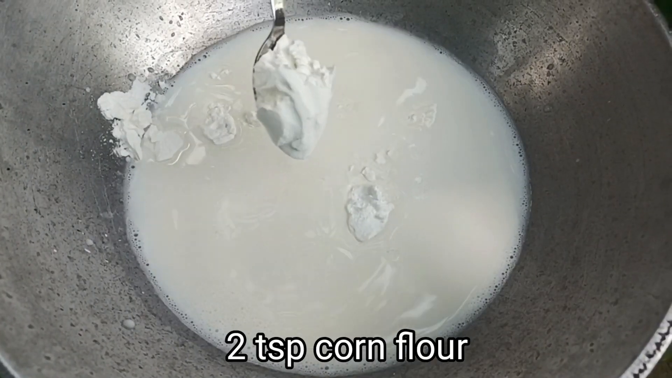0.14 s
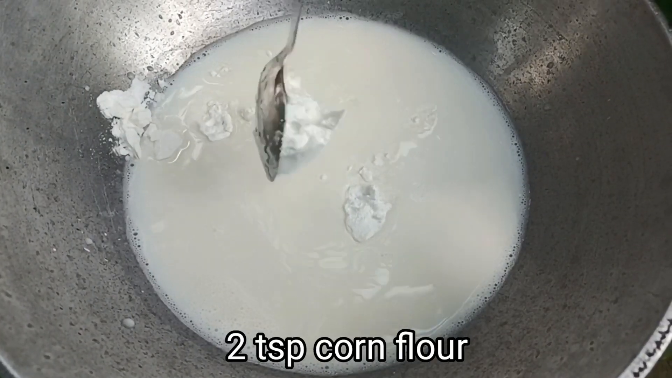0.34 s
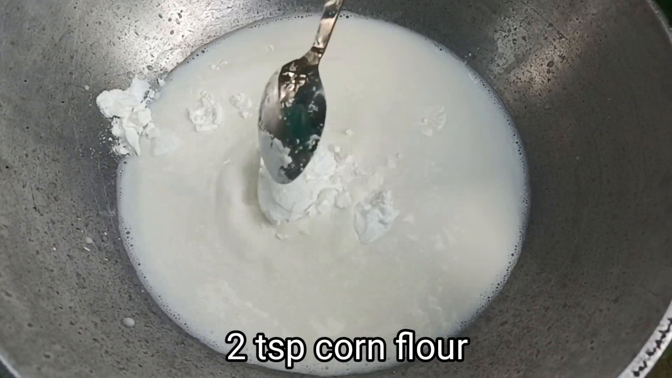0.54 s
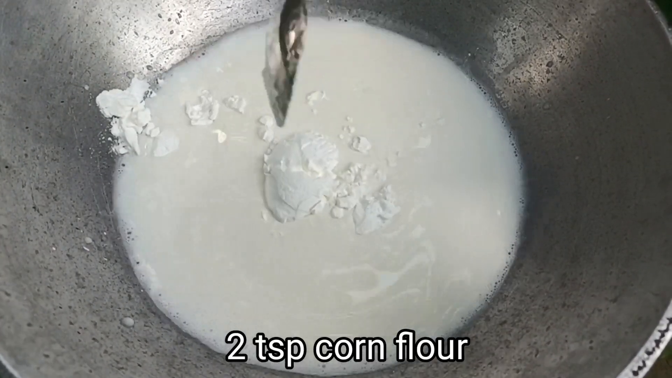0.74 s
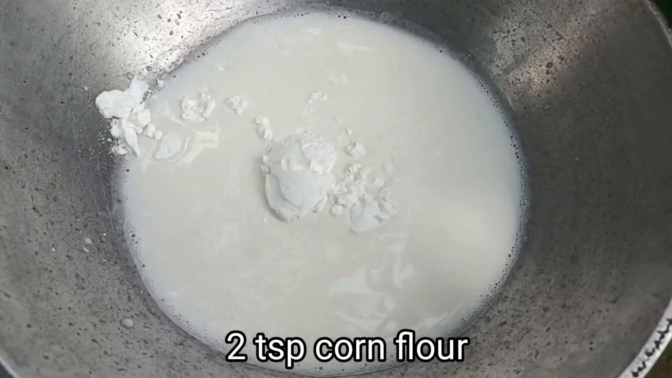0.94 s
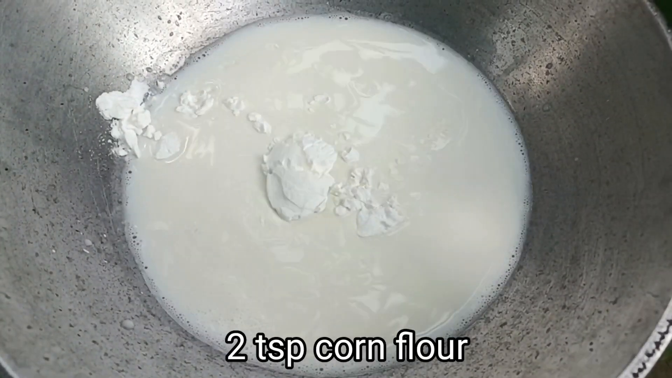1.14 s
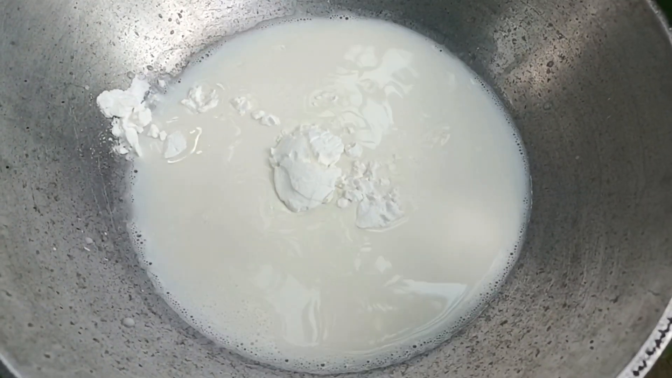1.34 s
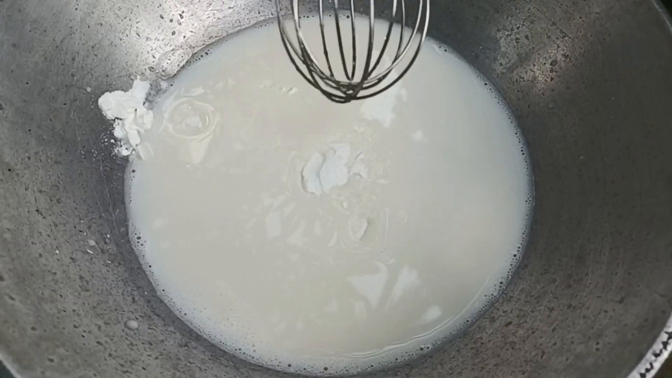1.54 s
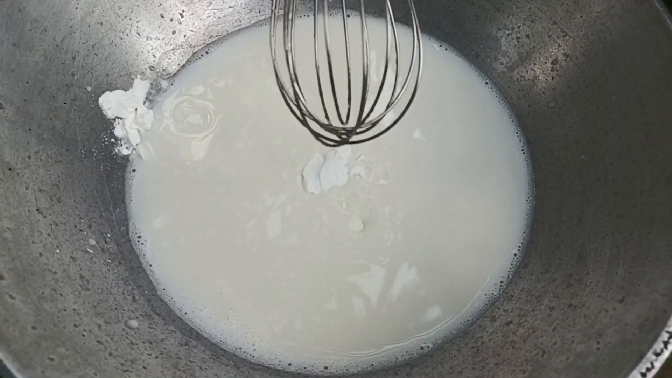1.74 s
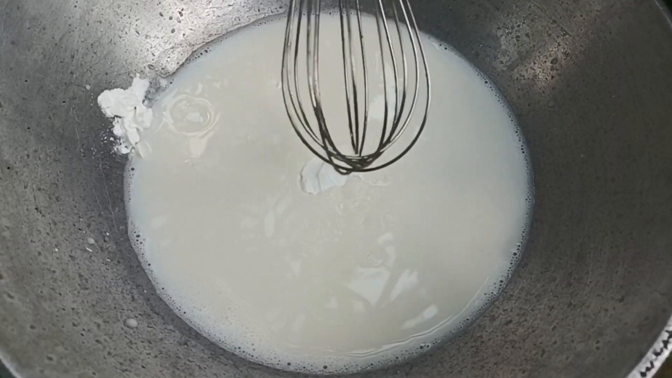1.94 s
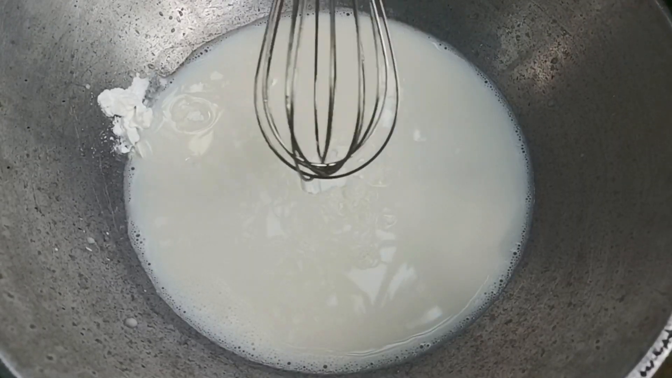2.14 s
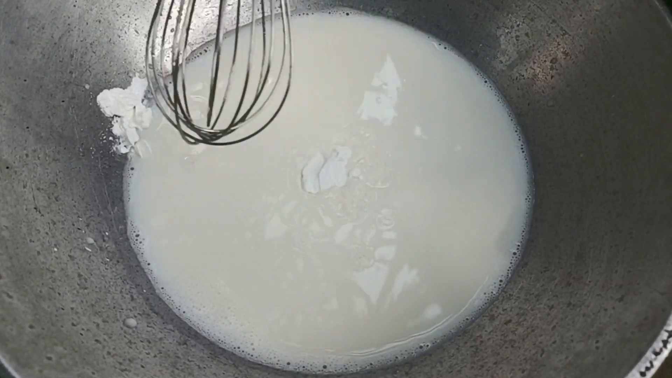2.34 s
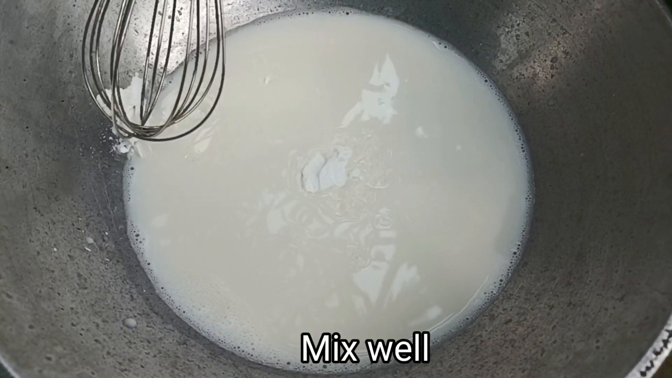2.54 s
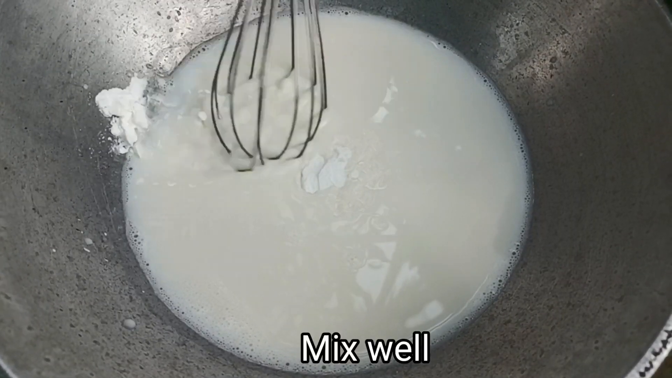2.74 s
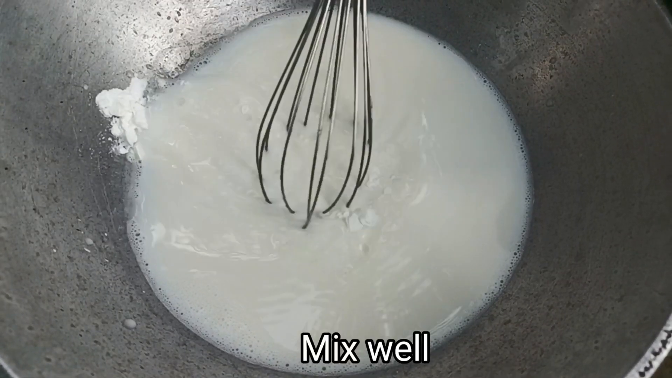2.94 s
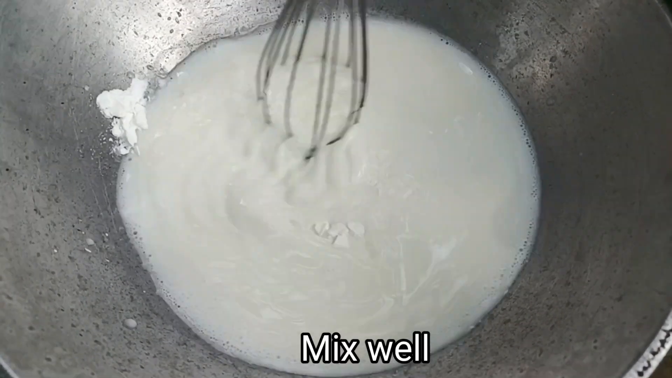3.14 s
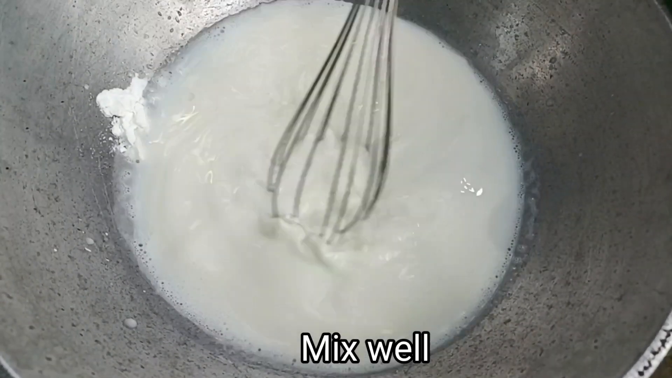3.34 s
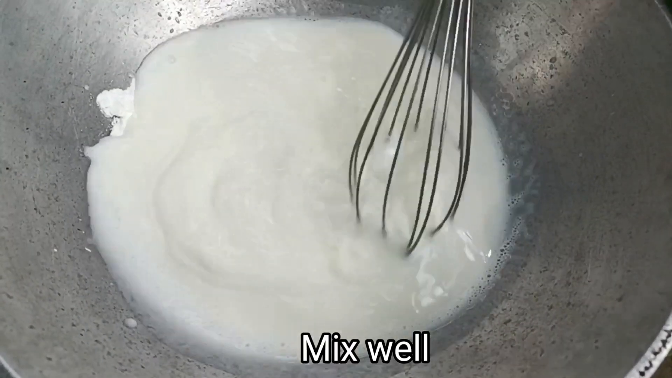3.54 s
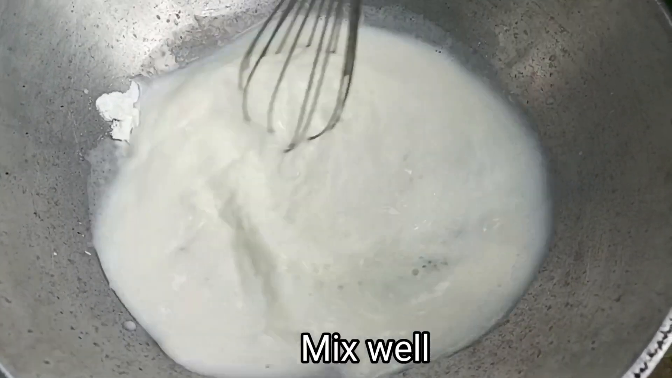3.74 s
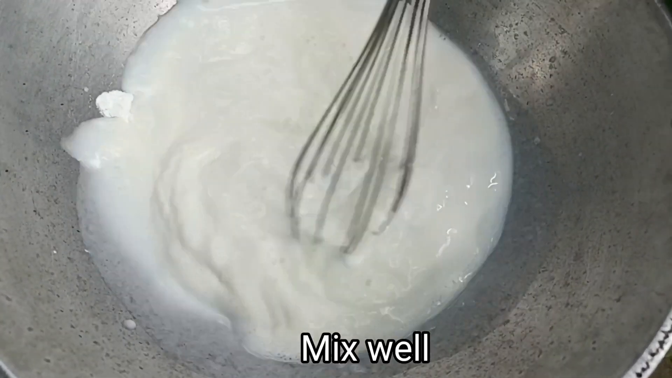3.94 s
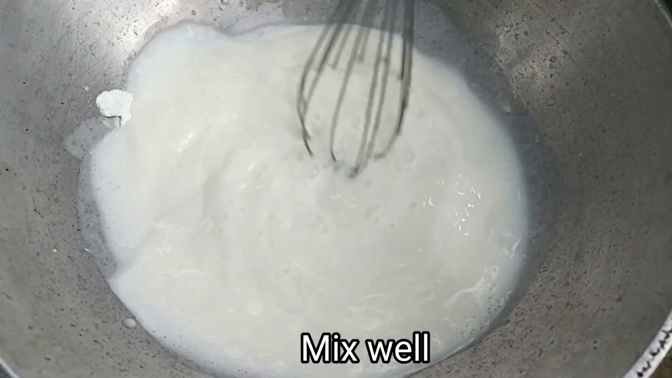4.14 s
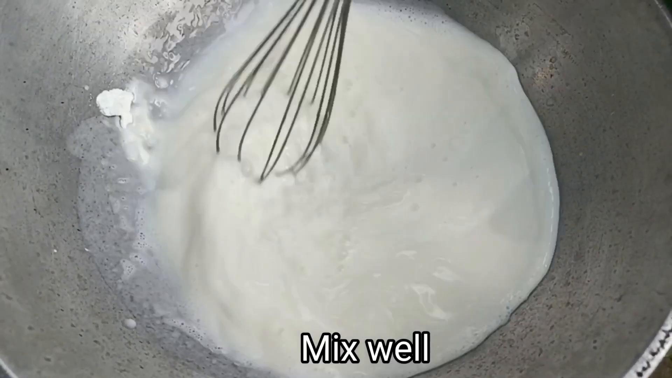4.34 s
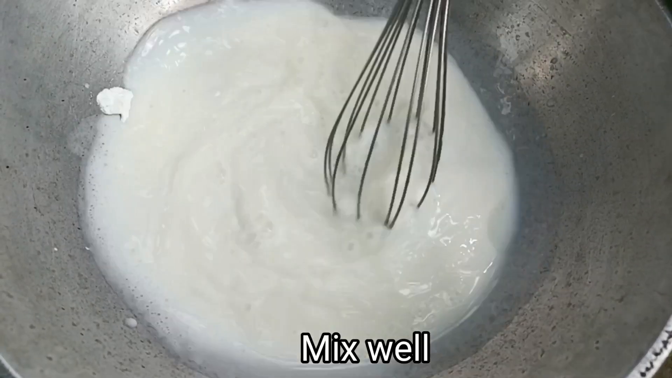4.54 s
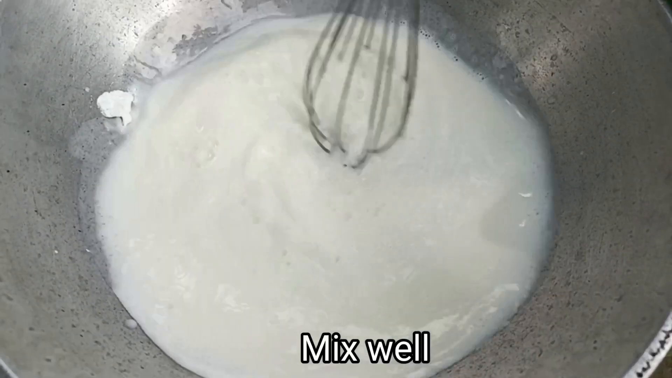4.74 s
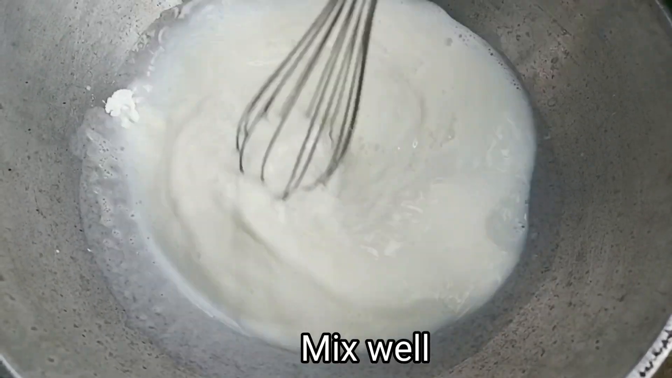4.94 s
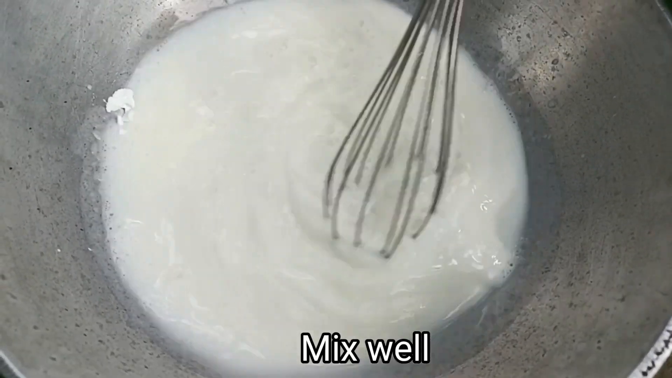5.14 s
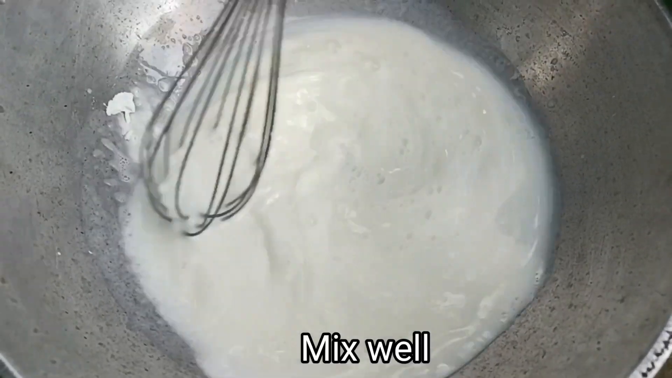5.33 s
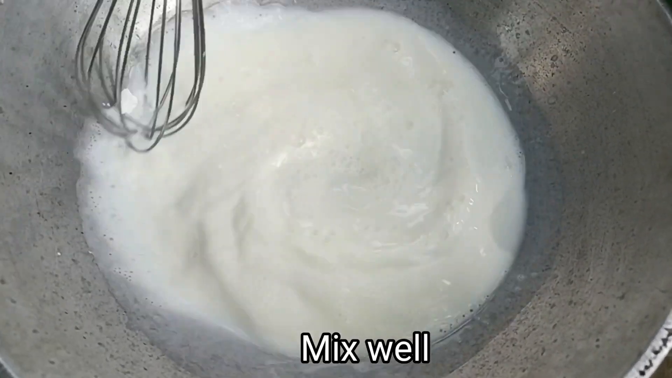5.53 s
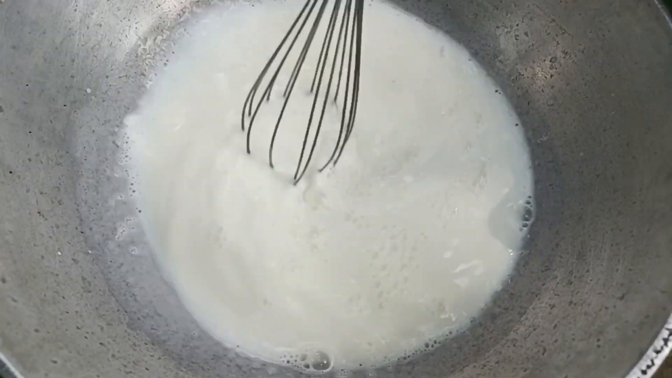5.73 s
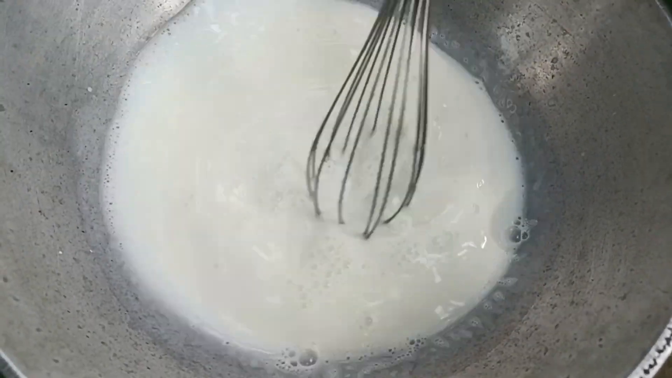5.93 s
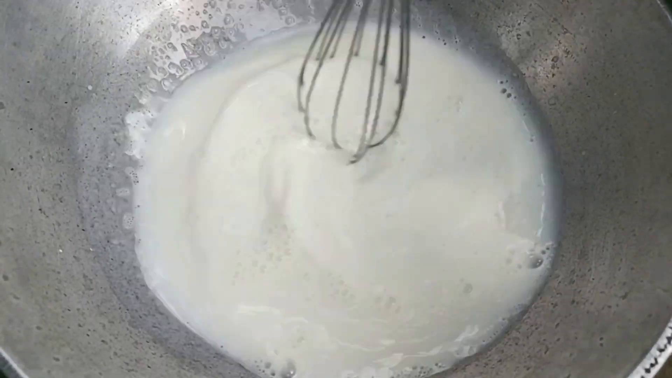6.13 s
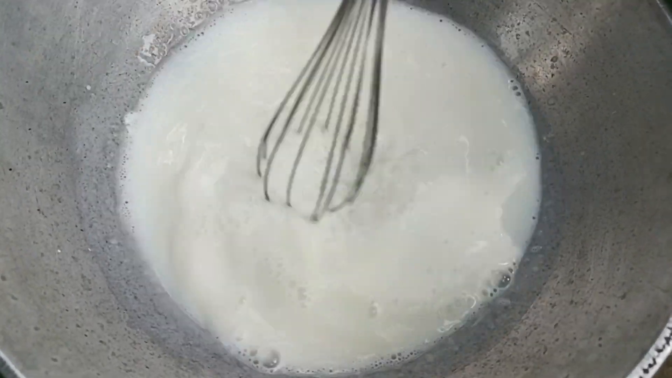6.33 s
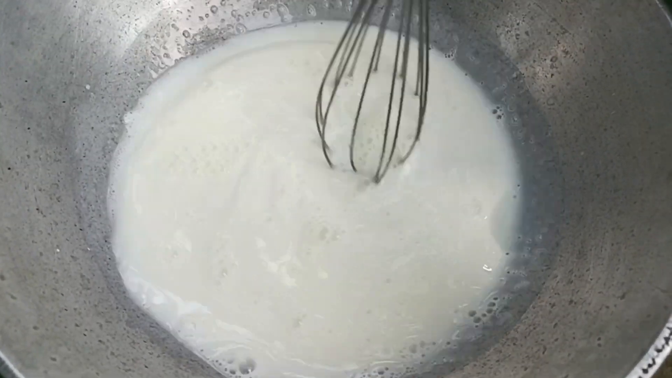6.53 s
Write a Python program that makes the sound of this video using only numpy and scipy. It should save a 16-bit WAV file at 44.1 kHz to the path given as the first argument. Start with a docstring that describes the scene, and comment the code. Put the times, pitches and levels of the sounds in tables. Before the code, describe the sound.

A quiet outdoor bed runs throughout: high crickets trilling and chirping, faint insect buzz early on, soft air noise and small distant bird calls. At about 0.4 s a lump of flour lands in milk in a metal pan, a brief grainy puff with a hollow plop falling in pitch. Only the background remains until about 2.5 s, with a faint coo from 2.3 s. At 2.6 s a wire whisk knocks the pan and slides with soft squeaks. From 3 s it circles quickly and irregularly: bright, scratchy metallic scrapes, short singing catches, ticks and jingling loops, the pan's tone swirling. Milk folds over with bubbly splashes and small gulps, especially from 3 to 5.7 s. Sharper knocks come near 4.7, 5.4 and 5.75 s. A fluttering coo sounds near 5.9 s, a soft low thump at 6.3 s, mostly left; whisking continues to the end. Close, small-kitchen perspective.

```python
"""Crickets, buzzing insects and a few far birds, from pulsed tones, narrow noise and gliding tones, are heard from outside.
Corn flour drops off a spoon into milk in a metal pan: random grains ring, and its hollows plop with falling pitch.
A wire whisk touches down and stirs in circles: its wires knock, and stick and slip, so the pan rings and loops squeak.
Milk folds over in bubbles and gulps while the wall's pitch swirls; near the end comes one soft low thump."""
import sys
import numpy as np
from scipy import signal
from scipy.fft import rfft, irfft, next_fast_len
from scipy.io import wavfile
from scipy.ndimage import uniform_filter1d

SR = 44100
rng = np.random.default_rng(int(sys.argv[2]) if len(sys.argv) > 2 else 0)


def generate_wav(sig):
    """Save sig (samples, or channels by samples) to the path in sys.argv[1] as 16-bit PCM at SR."""
    pcm = np.round(np.clip(np.atleast_2d(sig).T, -1, 1) * 32767).astype(np.int16)
    wavfile.write(sys.argv[1], SR, pcm)


N = 290178
TIME = np.arange(N) / SR

# resonances of the wet pan wall: pitch_hz, width_hz, level_db
PAN_MODES = [(1710, 35, -13), (2076, 34, 10.5), (2545, 47, 14), (3083, 125, 8), (3712, 62, -1.5),
             (4503, 290, -3.5), (5025, 73, 2)]
# light drag of the wires between hard rubs, before the whisk's own trim: time_s, level_db
DRAG_LEVELS = [(2.6, -74), (2.73, -53), (2.929, -60.5), (2.938, -41), (3.05, -43), (3.25, -48), (3.33, -38),
               (3.55, -45.5), (3.72, -48), (3.92, -46), (4.13, -44), (4.36, -43.5), (4.52, -43),
               (5.22, -45), (5.3, -64), (5.42, -56.5), (5.46, -45), (5.57, -52), (5.62, -43.5), (5.68, -40),
               (5.88, -44), (6.2, -48), (6.34, -41.5), (6.58, -48)]


def from_db(db):
    """Decibels to amplitude gain: 20 dB is a factor of ten."""
    return 10 ** (np.asarray(db) / 20)


def rms_one(x):
    """Scale to unit mean power."""
    return x / np.sqrt(np.mean(x ** 2) + 1e-20)


def pan(db):
    """Stereo placement by level difference, left minus right, split evenly between the channels."""
    return from_db(np.array([[db], [-db]]) / 2)


def band(x, order, low_hz, high_hz):
    """Band-pass filter: only the partials between two cutoffs remain strong."""
    return signal.sosfilt(signal.butter(order, [low_hz, high_hz], "band", fs=SR, output="sos"), x)


def colour(x, points):
    """Spectral shaping: gains in dB, interpolated over log frequency, multiply the spectrum."""
    hz, db = np.transpose(points)
    size = next_fast_len(N + 4096)
    grid = np.arange(size // 2 + 1) * SR / size + 1
    gain = from_db(np.interp(np.log(grid), np.log(hz), db))
    return irfft(rfft(x, size) * gain, size)[..., :N]


def resonate(x, hz, width_hz):
    """Damped resonance: a two-pole filter with unit gain at its peak."""
    r = np.exp(-np.pi * width_hz / SR)
    zeros = np.array([1, 0, -1]) * (1 - r * r) / 2
    poles = [1, -2 * r * np.cos(2 * np.pi * hz / SR), r * r]
    return signal.lfilter(zeros, poles, x + 1e-18)


def drift(rate):
    """Slow random modulation: chance values, rate of them a second, joined by lines; rms 1."""
    knots = rng.standard_normal(N // 8)
    return rms_one(np.interp(TIME * rate, np.arange(len(knots)), knots))


def grains(per_s, spread_db):
    """Shot noise: random impulses of uneven size and sign; rms 1."""
    sizes = from_db(spread_db * np.minimum(rng.exponential(1, N), 4))
    sizes = sizes * rng.choice([-1, 1], N)
    return rms_one(sizes * (rng.random(N) < per_s / SR))


def arch(start, length):
    """Half-sine envelope: progress 0-1 through a note, and its rounded swell."""
    u = np.clip((TIME - start) / length, 0, 1)
    swell = np.zeros(N)
    inside = (u > 0) & (u < 1)
    swell[inside] = np.sin(np.pi * u[inside])
    return u, swell


def reflect(x, t60, wet_db):
    """Reverberation: convolution with exponentially dying noise, independent in each channel."""
    t = TIME[:SR // 2]
    tail = rng.standard_normal((2, len(t))) * from_db(-60 * t / t60)
    tail *= from_db(wet_db) / np.sqrt(np.sum(tail ** 2, axis=1, keepdims=True))
    wet = signal.fftconvolve(np.atleast_2d(x), tail, axes=1)[:, :N]
    return (x + wet) / np.sqrt(1 + from_db(2 * wet_db))


def narrow_noise(hz, width_hz):
    """Band-limited noise: stereo noise through the same resonance twice; rms 1."""
    once = resonate(rng.standard_normal((2, N)), hz, width_hz)
    return rms_one(resonate(once, hz, width_hz))


def glides(rows):
    """Narrow-band noise on a gliding carrier: hoarse tones that swell, slide in pitch and fade."""
    out = np.zeros((2, N))
    for s, length, db, start_hz, end_hz, width_hz in rows:
        u, swell = arch(s, length)
        on = swell > 0
        phase = 2 * np.pi * length * u[on] * (start_hz + (end_hz - start_hz) * u[on] / 2)
        narrow = signal.butter(2, width_hz / 2, fs=SR, output="sos")
        hoarse = signal.sosfilt(narrow, rng.standard_normal((2, 2, len(phase))))
        mid, side = rms_one(hoarse[0] * np.cos(phase) + hoarse[1] * np.sin(phase))
        out[:, on] += from_db(db) * swell[on] * np.array([mid + 1.42 * side, mid - 1.53 * side])
    return out


def air(level_db=-73.5):
    """Background noise: partly correlated channels with a shaped spectrum and a drifting level."""
    # spectrum of the air: frequency_hz, gain_db
    air_colour = [(20, -17), (45, -17), (80, -3), (170, -2), (300, -9), (700, -12.5), (1200, -16),
                  (2500, -14), (4300, -23.5), (7000, -26.5), (8500, -24), (10500, -47), (12000, -70)]
    noise = rng.standard_normal(N) + 1.04 * rng.standard_normal((2, N))
    return from_db(level_db) * rms_one(colour(noise, air_colour)) * from_db(0.72 * drift(8.4))


def stridulate(hz, width_hz, pulses_per_s, waver_hz, scatter_db):
    """Stridulation: each wing stroke is a short burst of high tone, blurred by scattered sound; rms 1."""
    strokes = np.cumsum(pulses_per_s * (1 + 0.016 * drift(8.7))) / SR
    pulse = (.5 + .5 * np.cos(2 * np.pi * strokes)) ** 2
    tone = np.sin(2 * np.pi * np.cumsum(hz + waver_hz * drift(300)) / SR)
    direct = rms_one(pulse * tone) * pan(-7) * from_db(1.0 * drift(60))
    return rms_one(direct + from_db(scatter_db) * narrow_noise(hz, width_hz))


def crickets(trill_db=-59.5, chirp_db=-64, chorus_db=-68, buzz_db=-71, buzz_rest_db=-75.5):
    """Amplitude modulation makes one cricket trill in bouts and one chirp evenly, over chorus and buzz."""
    # swells of far buzzing insects: start_s, length_s
    buzz_bouts = [(-.2, 0.78), (0.617, 0.53), (1.54, 0.49)]
    # progress 0-1 through each repeated bout and chirp
    bout = ((TIME - 1.037) / 1.53) % 1
    chirp = ((TIME - .017) / .122) % 1
    bout_db = np.interp(bout, [0, .22, .45, .99, 1], [-25, -14, -2, 1, -25])
    syllable_db = np.interp(chirp, [0, .1, .3, .5, .93, 1], [-6, -16, -11, -2, 1, -6])
    trill = from_db(trill_db + bout_db) * stridulate(9897, 630, 140, waver_hz=86.8, scatter_db=2.5)
    chirps = from_db(chirp_db + syllable_db) * stridulate(8970, 380, 125, waver_hz=72.2, scatter_db=-1.5)
    chorus = from_db(chorus_db) * narrow_noise(9590, 950) * pan(-14.0)
    swells = sum(arch(s, length)[1] for s, length in buzz_bouts)
    buzz_gain = from_db(buzz_rest_db) + from_db(buzz_db) * swells
    buzz = buzz_gain * from_db(0.93 * drift(9.6)) * narrow_noise(5387, 530)
    low_pass = signal.butter(20, 10600, fs=SR, output="sos")
    return signal.sosfilt(low_pass, trill + chirps + chorus + buzz)


def far_chirps(count=34, low_hz=2070, high_hz=4350, length_s=0.071, level_db=-73, fall=0.92, width_hz=240):
    """Stratified chance: one slightly falling bird chirp per time slot, at a random pitch, as rows for glides."""
    when, pitch = rng.random((count, 2)).T
    starts = (np.arange(count) + when) / count * TIME[-1]
    pitches = low_hz * (high_hz / low_hz) ** pitch
    return [(s, length_s, level_db, hz, hz * fall, width_hz) for s, hz in zip(starts, pitches)]


def birds(flutter_per_s=31):
    """Gliding tones: coos with a rolling amplitude flutter and higher, hoarser calls, smeared by echoes outdoors."""
    # far cooing bird, levels before panning: start_s, length_s, level_db, start_hz, end_hz, flutter_0_to_1
    coo_notes = [(2.3, 0.13, -63.5, 531, 541, 0.4), (2.541, 0.515, -67.5, 531, 544.7, 0.24),
                 (2.817, 0.27, -73, 695, 657, 0.3), (5.236, 0.3, -71, 726, 718, 0.55),
                 (5.897, 0.4, -56.5, 763, 735, 0.97)]
    # clearest far calls, blurred by distance: start_s, length_s, level_db, start_hz, end_hz, width_hz
    far_calls = [(-.1, 0.51, -65.5, 2390, 2041, 260), (.27, 0.047, -63.5, 3520, 3500, 119),
                 (.55, 0.44, -61.5, 2053, 1870, 245), (1.09, .14, -81, 3140, 3150, 160),
                 (1.37, 0.11, -60.5, 4770, 5050, 222), (1.49, 0.069, -73.5, 1226, 1222, 50),
                 (1.68, 0.11, -60, 6590, 5920, 396), (1.92, 0.098, -65.5, 3090, 3100, 151),
                 (2.18, 0.056, -66.5, 3045, 3000, 120), (2.225, 0.059, -71, 1960, 2300, 90),
                 (2.255, 0.079, -66, 2740, 2474, 111), (2.337, 0.03, -65.5, 1985, 1760, 180)]
    coos = np.zeros(N)
    for s, length, db, start_hz, end_hz, flutter in coo_notes:
        u, swell = arch(s, length)
        roll = 1 + flutter * np.sin(2 * np.pi * flutter_per_s * TIME + drift(22))
        roll = roll * from_db(0.5 * drift(50))
        phase = 2 * np.pi * length * u * (start_hz + (end_hz - start_hz) * u / 2)
        coos += from_db(db) * np.sqrt(2 * swell) * roll * np.sin(phase)
    calls = glides(list(far_calls) + far_chirps())
    return reflect(coos, t60=0.33, wet_db=-4.0) * pan(-19.0) + reflect(calls, t60=0.42, wet_db=-2.5)


def flour():
    """Granular impact: a lump of powder slumps on to the milk, and its random grains excite resonances in the pan."""
    # level contour of the landing flour: time_s, level_db
    flour_levels = [(.3, -93), (.39, -53.5), (.425, -48.5), (.465, -46), (.5, -51), (.57, -65.5),
                    (.68, -65)]
    # resonances under the grains: pitch_hz, width_hz, level_db
    flour_modes = [(680, 19, 3.5), (1680, 710, -6.5), (2042, 35, 6), (2754, 80, -3), (3210, 52, -4),
                   (4870, 610, -17)]
    near, far = grains(1200, spread_db=1.5), grains(1200, spread_db=2.0)
    crumbs = np.array([near + far, near - far * .5])
    puff = sum(from_db(db) * resonate(crumbs, hz, width) for hz, width, db in flour_modes)
    puff = band(puff, 4, 950, 5200)
    s, db = np.transpose(flour_levels)
    return from_db(np.interp(TIME, s, db, left=-120, right=-120)) * rms_one(puff)


def plops():
    """Cavity resonance: the hollow that the flour makes in the milk rings and sinks in pitch."""
    # ringing hollows: start_s, length_s, level_db, start_hz, end_hz, width_hz
    hollows = [(.395, 0.1, -47.5, 1400, 1257, 106), (.46, .14, -58.5, 1220, 1163, 82)]
    return glides(hollows)


def slides():
    """Friction squeal: wet wires slide with a soft, gliding narrow-band tone."""
    # squeals: start_s, length_s, level_db, start_hz, end_hz, width_hz
    squeals = [(2.52, .1, -71.5, 1750, 2350, 110), (2.64, 0.16, -59, 1730, 2060, 171),
               (2.7, 0.17, -55.5, 2193, 2050, 382), (2.81, 0.21, -61, 1900, 1580, 150),
               (3.35, 0.074, -51.5, 1620, 1320, 100), (3.745, .04, -63, 980, 1920, 150),
               (5.35, 0.065, -53.5, 2920, 3250, 243), (5.355, 0.078, -52.5, 3420, 3510, 200)]
    return glides(squeals) * pan(0.94)


def drag():
    """Sliding friction: gain of the wires' light drag, practically silent until the whisk is in the pan."""
    return from_db(np.interp(TIME, *np.transpose(DRAG_LEVELS), left=-120))


def singing_wire(hz, count, width_hz):
    """Phase diffusion: a wire holds one pitch while its phase wanders, widening its line; rms 1."""
    t = TIME[:count]
    wander = np.cumsum(rng.standard_normal(count)) * np.sqrt(2 * np.pi * width_hz / SR)
    wander = uniform_filter1d(wander, size=60)
    return np.sqrt(2) * np.sin(2 * np.pi * hz * t + wander + rng.uniform(0, 2.73, (2, 1)))


def taps(tap_db=-12, crack_s=0.0087, ring_db=-7):
    """Impact excitation: a knock cracks, rings the pan and thuds its bottom; loops ring on if the whisk bounces clear."""
    # wires knocking on the pan, knock level before tap_db: time_s, peak_db, bottom_thud_db, free_ring_db
    knocks = [(2.615, -27, 8, -20), (2.6447, -37, -11.5, -24), (3.4376, -31.5, 8.5, -21),
              (4.5606, -38, 13.5, -16), (4.709, -24.5, -11, -19), (5.434, -21.5, -5, -7),
              (5.441, -26, 7, 0.5), (5.7529, -23.5, -15, -12)]
    # pan bottom under a knock: pitch_hz, width_hz, level_db
    thud_modes = [(539, 52, 9), (740, 134, 3)]
    # loops ringing freely after a knock: pitch_hz, t60_s, level_db
    whisk_modes = [(2644, 0.41, -17.5), (2950, 0.36, -26), (3904, 0.17, -19.5), (4484, 0.25, -20.5),
                   (5400, .35, -26), (5736, 0.43, -32)]
    cracks, pushes, loops = np.zeros(N), np.zeros(N), np.zeros((2, N))
    t = TIME[:SR // 2]
    for s, db, thud_db, free_db in knocks:
        span = slice(int(s * SR), int(s * SR) + len(t))
        burst = from_db(db + tap_db) * np.exp(-t / crack_s) * rng.standard_normal(len(t))
        cracks[span] += burst
        pushes[span] += from_db(thud_db) * burst
        for hz, t60, mode_db in whisk_modes:
            decay = from_db(db + free_db + mode_db - 60 * t / t60)
            loops[:, span] += decay * singing_wire(hz, len(t), width_hz=6)
    crack = band(cracks, 1, 2600, 7000)
    # a knock takes the pan's pitches, all with one width
    ring = sum(resonate(crack, hz, 174) for hz, _, _ in PAN_MODES) * 10
    thud = sum(from_db(db) * resonate(pushes, hz, width) for hz, width, db in thud_modes)
    return reflect(crack + from_db(ring_db) * ring + thud, t60=0.063, wet_db=9.5) + loops


def rubs(count=18):
    """Stick-slip events: sweeps, catches, ticks and chance light catches, as
    (start_s, rise_s, length_s, level_db, pitches_hz, singing_share)."""
    # hard sweeps over the bottom, two singing wires each: start_s, length_s, level_db, first_hz, second_hz
    sweeps = [(3.004, 0.03, -36.5, 4514, 2520), (3.434, 0.03, -34.5, 3100, 2530),
              (3.6, 0.11, -38, 3740, 3120), (3.944, 0.035, -32, 3680, 3216),
              (4.228, 0.085, -36, 3490, 2574), (4.552, 0.074, -36, 2745, 3620),
              (4.655, 0.074, -40, 2562, 2094), (4.763, 0.024, -41.5, 4478, 2562),
              (4.862, 0.077, -36.5, 3709, 5020), (4.996, 0.024, -36, 4870, 3200),
              (5.134, 0.11, -36.5, 2620, 3564), (5.651, 0.031, -38.5, 3730, 1700),
              (5.95, 0.054, -39, 2593, 3660), (6.081, 0.018, -47, 4000, 3300),
              (6.276, 0.054, -38.5, 2995, 2061), (6.413, 0.054, -39.5, 3550, 2474)]
    # a single loop catches and sings: start_s, peak_db, pitch_hz, length_s
    catches = [(3.315, -23.5, 2497, 0.0074), (3.5865, -23.5, 2533, 0.015), (3.774, -26, 2320, 0.01),
               (3.791, -30, 2315, 0.021), (3.827, -27, 2196, 0.019), (3.861, -27.5, 4700, 0.0092),
               (3.885, -30.5, 3340, 0.0085), (4.05, -23.5, 2910, 0.0085), (4.102, -28, 3580, 0.0082),
               (4.203, -24.5, 2570, 0.0087), (4.391, -30.5, 2514, 0.021), (4.474, -31.5, 4700, 0.012),
               (4.666, -25, 2503, 0.024), (4.796, -28.5, 2460, 0.0069), (4.838, -24, 2195, 0.011),
               (4.964, -23.5, 2124, 0.02), (4.997, -23.5, 2567, 0.032), (5.05, -29, 2535, 0.0064),
               (5.076, -22, 2610, 0.0075), (5.101, -24.5, 4570, 0.02), (5.562, -33, 4420, 0.015),
               (5.587, -27, 4470, 0.015), (5.588, -28.5, 5240, 0.015), (5.71, -27.5, 3085, 0.062),
               (5.752, -24, 2037, 0.022), (5.821, -30.5, 3600, 0.015), (5.84, -33, 2695, 0.06),
               (5.915, -31.5, 4570, 0.026), (6.043, -30, 2590, 0.011), (6.083, -22, 2600, 0.02),
               (6.112, -25.5, 1956, 0.022), (6.136, -33.5, 3350, 0.038), (6.142, -30, 2420, 0.019),
               (6.236, -34, 2600, 0.028), (6.355, -33, 2530, 0.015), (6.479, -28.5, 2515, .011),
               (6.513, -25, 2540, 0.022), (6.572, -26, 3030, 0.0085)]
    # a loop snaps free with a short tick: start_s, peak_db, pitch_hz
    ticks = [(2.949, -38, 4400), (3.105, -41, 2000), (3.405, -27, 3620), (3.4805, -27, 4880),
             (3.5439, -31.5, 2670), (3.684, -26, 5130), (4.023, -28, 2620), (4.0896, -29, 3600),
             (4.172, -26.5, 4520), (4.6977, -23, 2600), (4.785, -26, 3190), (4.8614, -28, 2230),
             (5.1497, -30, 3620), (5.9589, -23, 2530), (6.2796, -24.5, 3014), (6.4193, -26, 3950),
             (6.4368, -24.5, 3646)]
    catch_rise_s, lock_s = 0.0015, 0.015
    # a sweep leans in more slowly than a catch
    rows = [(s, 0.00399, length, db, pitches, 0.19) for s, length, db, *pitches in sweeps]
    for s, db, hz, length in catches:
        # the longer a wire holds, the more of the power goes into its tone
        share = 1 - np.exp(-length / lock_s)
        rows.append((s, catch_rise_s, length, db - 11.5, [hz], share))  # held level against the peak
    rows += [(s, 0.00053, 0.0039, db - 9.5, [hz], 0.52) for s, db, hz in ticks]
    # light catches fall at chance, one in each equal slot of time
    slots = np.linspace(DRAG_LEVELS[0][0], TIME[-SR // 50], count + 1)
    low_hz, high_hz = PAN_MODES[1][0], PAN_MODES[-1][0]
    for start, end, (when, hold, wire) in zip(slots, slots[1:], rng.random((count, 3))):
        s = start + when * (end - start)
        db = np.interp(s, *np.transpose(DRAG_LEVELS)) - 0.5
        hz = low_hz * (high_hz / low_hz) ** wire
        rows.append((s, catch_rise_s, 0.013 * (.5 + hold), db, [hz], 0.48))
    return rows


def wall(x, sharpness=1.98, size=256):
    """Radiation cutoff: the wall sounds from its lowest resonance upward, a resonant high-pass following the swirl."""
    # lowest wall resonance, moving as the milk swirls over it: time_s, pitch_hz
    swirl = [(3.0, 1590), (3.22, 1710), (3.41, 1440), (3.45, 1490), (3.6, 1250), (3.86, 1600), (3.98, 1400),
             (4.17, 1630), (4.24, 1720), (4.4, 1410), (4.68, 1610), (4.8, 1240), (4.92, 1540), (5.02, 1380),
             (5.15, 1620), (6.11, 1600), (6.21, 1830), (6.37, 1450), (6.46, 1730)]
    out, state = np.zeros_like(x), np.zeros((2, 2, 2))
    pitches = np.interp(TIME[::size], *np.transpose(swirl))
    for i, w in zip(range(0, N, size), 2 * np.pi * pitches / SR):
        c, damp = np.cos(w), np.sin(w) / (2 * sharpness)
        stage = np.array([(1 + c) / 2, -1 - c, (1 + c) / 2, 1 + damp, -2 * c, 1 - damp]) / (1 + damp)
        out[:, i:i + size], state = signal.sosfilt([stage, stage], x[:, i:i + size], zi=state)
    return out / sharpness


def travel(x, places_per_s, count=4):
    """Position-dependent response: each place of contact rings differently; the whisk wanders between them."""
    places = sum(drift(places_per_s) * reflect(x, t60=0.031, wet_db=3.5) for _ in range(count))
    return places / np.sqrt(count)


def scrape(slips_per_s, spread_db, chatter_db, modes_db, shift_db, loops_db=-1, bottom_db=3.5):
    """Stick-slip friction: slips of many wires excite the pan and bunch as the wires chatter; rms near 1."""
    # wet pan wall under the wires: frequency_hz, gain_db
    pan_colour = [(600, 8), (1200, -13), (1700, -4.5), (2500, -6.5), (3500, 2), (5200, 4), (6100, -1),
                  (8000, -7.5), (11000, -7), (15000, -22)]
    # pan bottom under the wires: frequency_hz, gain_db
    bottom_colour = [(200, -32.5), (420, -22), (570, -6.5), (820, -11), (1150, -30), (2000, -49)]
    near, far = grains(slips_per_s, spread_db), grains(slips_per_s, spread_db)
    slips = np.array([near + 0.48 * far, near - 0.97 * far]) * from_db(chatter_db * drift(170))
    # as the contact travels, it favours now one resonance and now another
    rung = sum(from_db(db + shift_db * drift(22)) * resonate(slips, hz, width)
               for hz, width, db in PAN_MODES)
    # the wet loops add damped resonances that come and go as each one touches
    pitches = np.geomspace(1800, 6000, num=20) * rng.uniform(.97, 1.03, 20)
    loops = sum(from_db(5 * np.minimum(drift(25), 1.8)) * resonate(slips, hz, 55) for hz in pitches)
    excited = slips + from_db(modes_db) * rung + from_db(loops_db) * loops
    sides = wall(colour(excited, pan_colour))
    # the bottom, loaded with milk, answers lower down
    bottom = from_db(bottom_db) * colour(slips, bottom_colour)
    body = travel(sides + bottom, places_per_s=13.0)
    # the hand keeps the pressure even over about a hundredth of a second
    return body / np.sqrt(uniform_filter1d(body.mean(0) ** 2, size=600) + 1e-9)


def tinks(force, per_s, width_hz, count=30):
    """Free vibration: the loops flick against each other and ring briefly, each at its own pitch and side."""
    out = np.zeros((2, N))
    for hz in np.geomspace(1900, 5200, num=count) * rng.uniform(.98, 1.02, count):
        # offset the power lost in a narrow resonance and shared among the loops
        flicks = grains(per_s, spread_db=1.5) * force * np.sqrt(SR / (np.pi * width_hz) / count)
        out += resonate(flicks, hz, width_hz) * (1 + rng.normal(0, 1.0) * np.array([[1], [-1]]))
    return out


def whisk(judder_db=2.11, fall_s=0.007, wire_fall_s=0.0072, drag_db=-4, rub_db=-2, others_db=-10,
          tink_db=-8, bright_db=-38, brighten=0.12):
    """Friction-driven vibration: hard rubs on a light drag split power between scrape and song; gives sound and force."""
    # where the pan sounds from: frequency_hz, left_minus_right_db
    pan_side = [(300, -5), (900, 1.5), (1600, 10), (2100, 1.5), (3200, 8), (4500, 13), (5500, 2.5),
                (6300, 1.5), (7500, -12.5), (11000, 4), (15000, -12)]
    power, wires = (from_db(drag_db) * drag()) ** 2, np.zeros((2, N))
    t = TIME[:SR // 5]
    for s, rise_s, length, db, pitches, share in rubs():
        share = min(share, .95)
        at = int((s - rise_s / 2) * SR)
        onset = from_db(db) * np.minimum(t / rise_s, 1)
        after = np.maximum(t - length, 0)
        rub = from_db(rub_db) * onset * np.exp(-after / fall_s)
        power[at:at + len(t)] += ((1 - share) * rub ** 2)[:N - at]
        main = sum(singing_wire(hz, len(t), width_hz=18) for hz in pitches)
        main = np.sqrt(share / len(pitches)) * main
        # neighbouring loops ring along at pitches of their own
        neighbours = rng.uniform(1900, 5200, size=2)
        others = sum(singing_wire(hz, len(t), width_hz=10) for hz in neighbours) / np.sqrt(2)
        song = onset * np.exp(-after / wire_fall_s) * (main + from_db(others_db) * others)
        wires[:, at:at + len(t)] += song[:, :N - at]
    # the loops meet the bottom one after another, so the force judders
    force = np.sqrt(power) * from_db(judder_db * drift(60))
    sound = force * scrape(slips_per_s=620, spread_db=0.8, chatter_db=3.5, modes_db=5.5, shift_db=5.0)
    # a hard contact is bright, a light one is dulled by the milk
    treble = colour(sound, [(4600, -40), (5400, -6), (6000, 0)])
    sound = sound + treble * ((force / from_db(bright_db) + 1e-6) ** brighten - 1)
    # the wet wires damp each flick within a few hundredths of a second
    flicked = tinks(force, per_s=7, width_hz=30)
    sound = sound + wires + from_db(tink_db) * flicked + taps()
    left, right = (colour(channel, [(hz, sign * db / 2) for hz, db in pan_side])
                   for channel, sign in zip(sound, (1, -1)))
    return np.array([left, right]), force


def bubbles(low_hz, high_hz, per_s, cycles):
    """Bubble resonance: twelve sizes, per_s of each, ring for a few cycles and echo from the pan wall."""
    pitches = np.geomspace(low_hz, high_hz, num=12)
    rung = sum(resonate(grains(per_s, spread_db=2.5), hz, hz / cycles) for hz in pitches)
    return reflect(rung, t60=0.14, wet_db=0.0)


def milk(force, splash_db=-9.0, churn_db=-23, slosh_db=-36, gulp_rise=0.35, lag_s=0.012, splash_width_hz=390):
    """Bubble acoustics: small ones ring at the surface, larger ones churn with each push; pockets gulp, rising in pitch."""
    # a wave of milk folds over, level before splash_db: start_s, length_s, level_db, bubble_pitch_hz
    waves = [(2.979, 0.065, -42.5, 754), (3.04, 0.12, -54, 875), (3.462, .15, -53, 1040),
             (3.642, 0.19, -46.5, 920), (4, 0.079, -44, 980), (4.223, 0.071, -51, 750),
             (4.311, 0.24, -41, 920), (4.554, 0.3, -44.5, 1070), (4.882, 0.094, -54.5, 695),
             (5.098, 0.12, -54.5, 735), (5.582, 0.16, -41, 910)]
    # air pockets closing behind the whisk: start_s, level_db, mid_pitch_hz
    gulps = [(3.008, -47, 600), (3.187, -64, 272), (3.491, -59, 267), (3.73, -43.5, 844),
             (3.82, -46.5, 653), (4.551, -53, 274), (5.115, -50, 442), (5.165, -58, 287),
             (5.434, -55.5, 271), (5.509, -57.5, 132)]
    # the milk follows the push of the whisk with a lag
    keep = np.exp(-1 / (lag_s * SR))
    push = signal.lfilter([1 - keep], [1, -keep], force)
    fizz = bubbles(550, 1615, per_s=45, cycles=24)
    splashes = sum(from_db(db) * arch(s, length)[1] * rms_one(resonate(fizz, hz, splash_width_hz))
                   for s, length, db, hz in waves)
    churn = band(bubbles(450, 800, per_s=8, cycles=16), 2, 430, 820)
    # the whole body of milk sloshes, lower still
    slosh = band(bubbles(150, 420, per_s=3, cycles=8), 2, 130, 430)
    out = from_db(splash_db) * splashes
    out = out + push * (from_db(churn_db) * rms_one(churn) + from_db(slosh_db) * rms_one(slosh))
    for s, db, hz in gulps:
        # larger, lower pockets last longer: 0.051 s at 268 Hz
        length = 0.051 * (268 / hz) ** 0.69
        u, swell = arch(s, length)
        phase = 2 * np.pi * hz * length * u * (1 + gulp_rise * (u - 1) / 2)
        out = out + from_db(db) * swell ** 2 * np.sin(phase)
    return out


def thump(start_s=6.338, length_s=0.039, pitch_hz=72, level_db=-55.5, side_db=16):
    """Low-frequency pulse: a few cycles of sine under a rounded envelope, mostly on the left."""
    tone = np.sin(2 * np.pi * pitch_hz * (TIME - start_s))
    return from_db(level_db) * arch(start_s, length_s)[1] ** 2 * tone * pan(side_db)


def scene():
    """Superposition: the pan reverberates in a small kitchen, with the outdoors behind it."""
    background = air() + crickets() + birds()
    wires, force = whisk()
    cooking = flour() + plops() + slides() + wires + milk(force) + thump()
    return background + reflect(cooking, t60=0.77, wet_db=-15.0)


def record(dry, cutoff_hz=15300):
    """Low-pass filtering: an elliptic filter cuts the top steeply."""
    return signal.sosfilt(signal.ellip(10, .1, 80, cutoff_hz, fs=SR, output="sos"), dry)


dry = scene()
out = record(dry)
generate_wav(out)
```